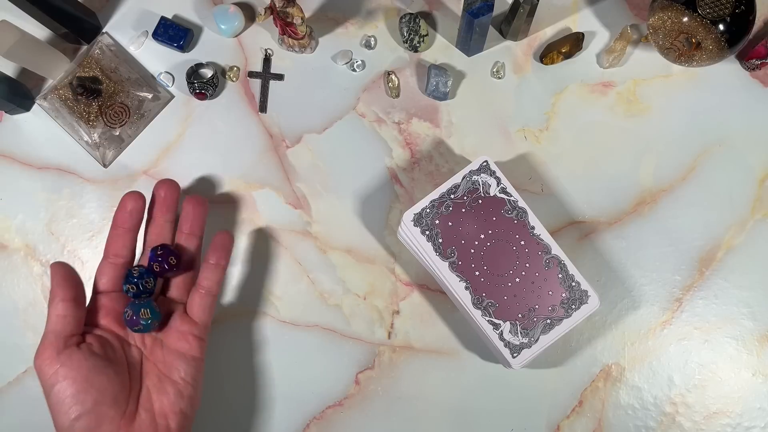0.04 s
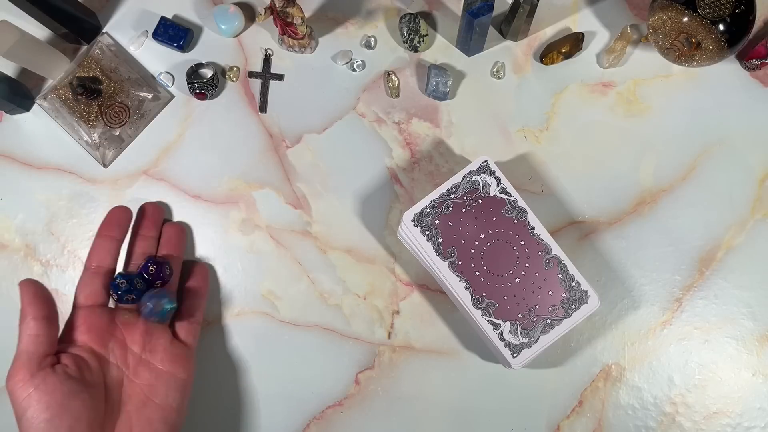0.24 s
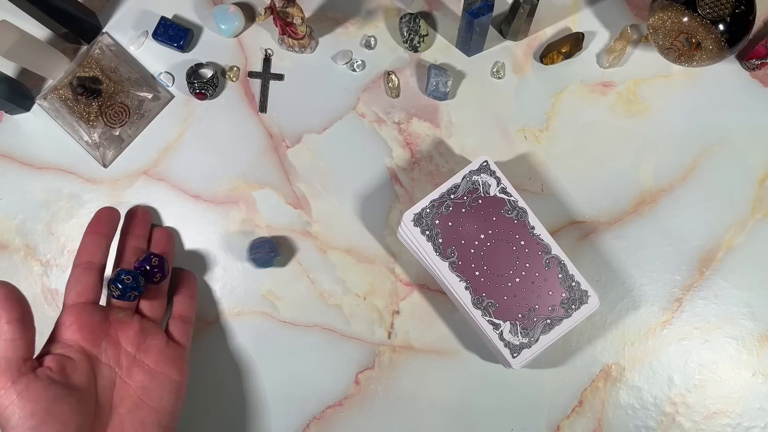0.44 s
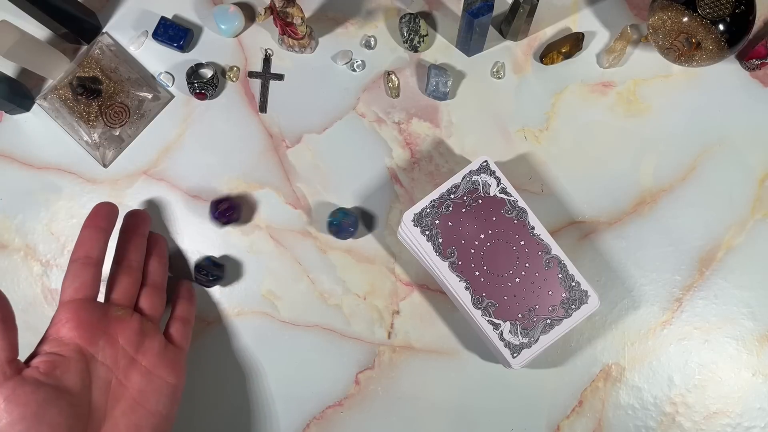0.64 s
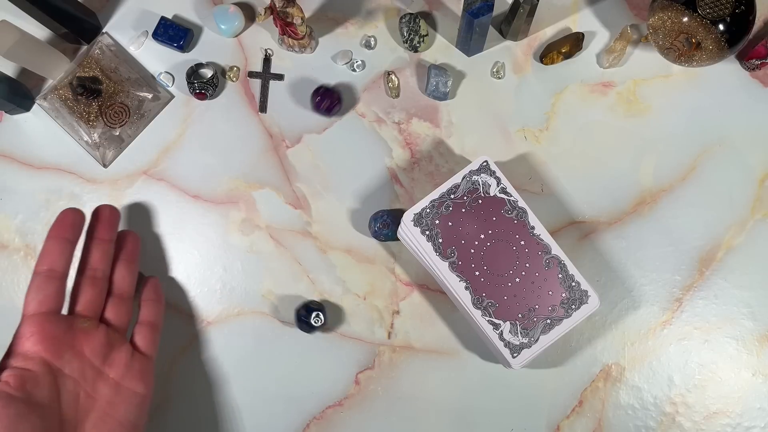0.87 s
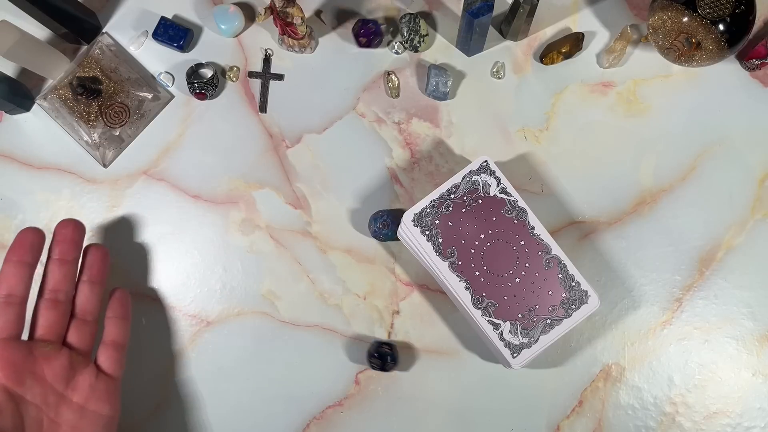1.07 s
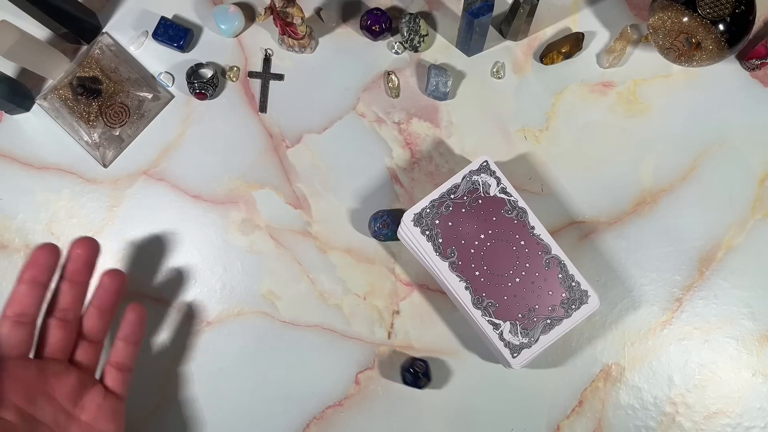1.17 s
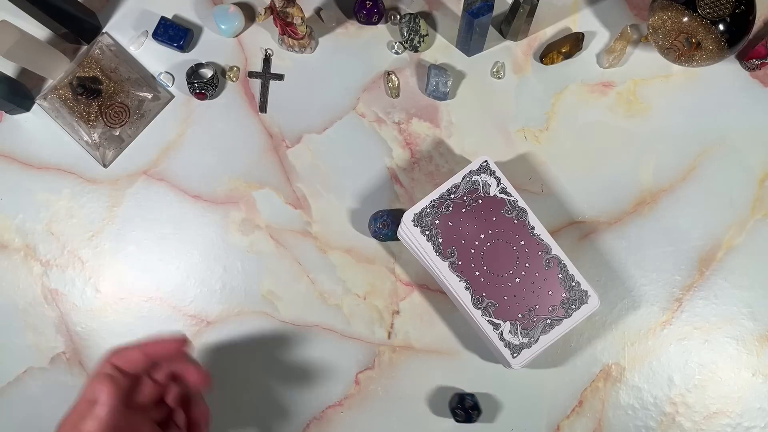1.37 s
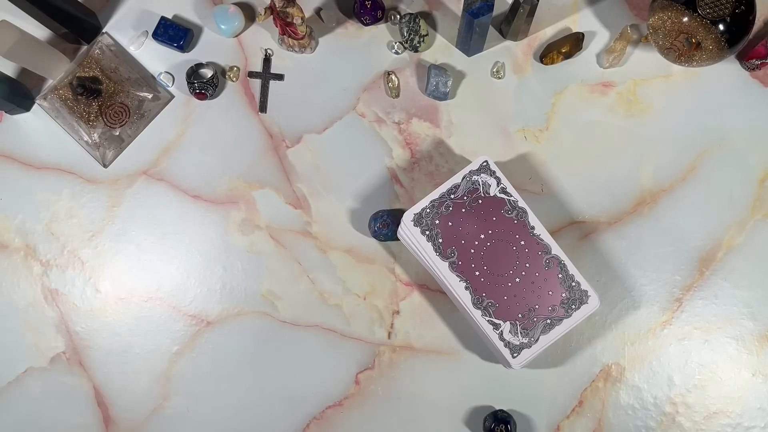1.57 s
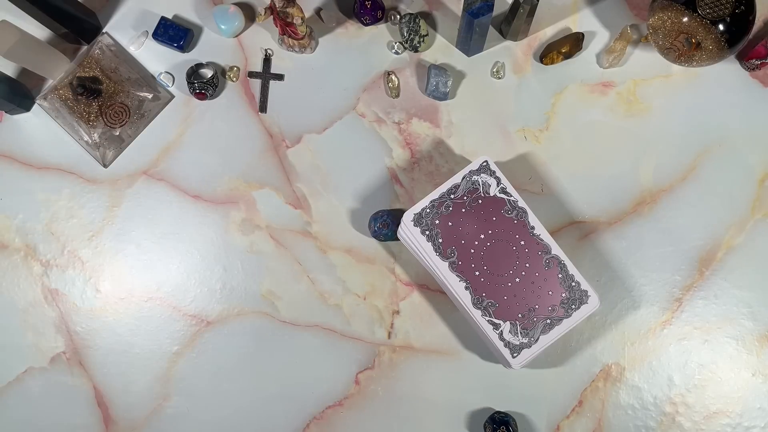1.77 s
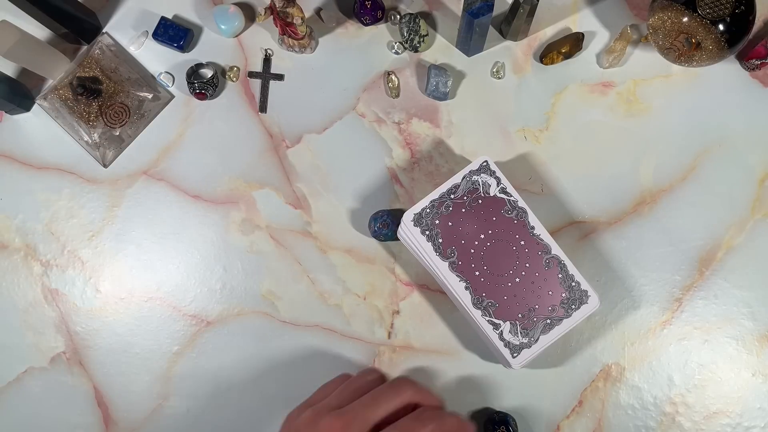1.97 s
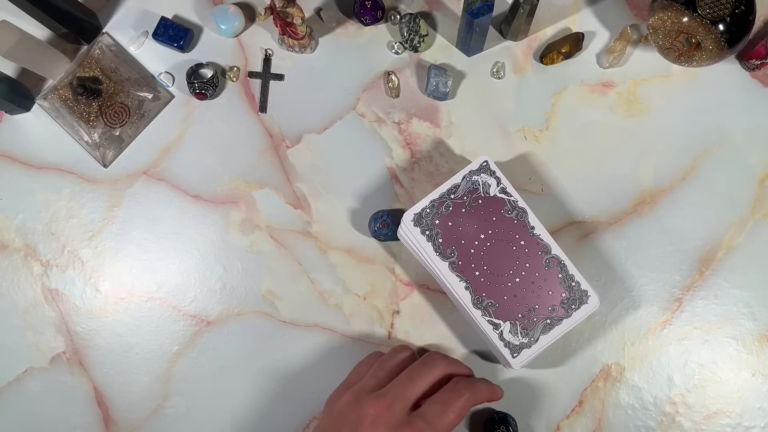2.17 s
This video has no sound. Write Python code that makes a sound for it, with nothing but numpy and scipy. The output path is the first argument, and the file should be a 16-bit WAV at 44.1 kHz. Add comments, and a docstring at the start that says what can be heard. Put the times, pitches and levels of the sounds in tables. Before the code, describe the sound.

Plastic dice are rolled on a hard tabletop, heard close up. They click faintly in a palm, then land and chatter from about 0.4 seconds, with the loudest sharp bounces between 0.6 and 0.9. Around 1 second one clinks lightly against glass and stone trinkets, followed by a small hollow knock. The last die topples in soft taps from 1.3 to 1.7 seconds, leaving a faint room hum.

```python
"""Three plastic dice drop one after another on a hard tabletop, bounce and chatter along on their edges.
Each hit is a fast-dying burst of noise that sets the top's low modes ringing. Before the throw they
click together in a palm; after it one clinks into glass and stone trinkets and stops with a hollow
knock, and the last topples to rest in soft, pitched taps.
A close stereo microphone in a small room with a faint hum."""
import sys
import numpy as np
from scipy import signal
from scipy.fft import rfft, irfft, next_fast_len
from scipy.io import wavfile

SR = 44100
rng = np.random.default_rng(int(sys.argv[2]) if len(sys.argv) > 2 else 0)


def digitize_waveform(pressure):
    """Quantize a signal to 16-bit integers and store it at the path in sys.argv[1].

    Rows of a 2-D input are taken as channels; values are limited to [-1, 1].
    """
    field = np.atleast_2d(pressure).T
    bounded = np.clip(field, -1, 1)
    quanta = np.round(bounded * 32767).astype(np.int16)
    wavfile.write(sys.argv[1], SR, quanta)


N = 97902

# spectrum of a hit on the tabletop: freq_hz, level_db
TOP_COLOUR = [(30, -47), (70, -23.5), (130, -7), (300, -1.5), (600, -0.5), (1200, 2.5), (2100, 3),
              (3400, 3), (5200, -2), (6150, -15.5), (7700, -10.5), (9200, -13.5), (10200, -23),
              (12500, -16.5), (14000, -22.5), (16000, -21)]
KNOCK_T60_S, BOUNCE_RISE_S, THUMP_HZ = 0.031, 0.00095, 700
LIKENESS = 0.71  # left-right correlation of a contact at its source


def undb(db):
    """Decibels to gain."""
    return 10 ** (np.asarray(db) / 20)


def unit(x):
    """Scale to rms 1."""
    return x / np.sqrt(np.mean(x ** 2) + 1e-20)


def decay(t, t60):
    """An envelope that falls 60 dB in t60 seconds."""
    return np.exp(-np.log(1000) * t / t60)


def curve(points, f):
    """Read (Hz, value) points on a log-frequency axis."""
    p = np.array(points)
    return np.interp(np.log(f + 1), np.log(p[:, 0]), p[:, 1])


def shape(x, db_at):
    """Minimum-phase EQ whose gain in dB is a function of frequency."""
    n = x.shape[-1]
    size = 2 * next_fast_len(n)
    cepstrum = irfft(np.log(undb(db_at(np.fft.rfftfreq(size, 1 / SR)))))
    cepstrum[1:size // 2] *= 2
    cepstrum[size // 2 + 1:] = 0
    return irfft(rfft(x, size) * np.exp(rfft(cepstrum)))[..., :n]


def pair(three, likeness):
    """Two partly alike channels from three unrelated signals."""
    return np.sqrt(likeness) * three[0] + np.sqrt(1 - likeness) * three[1:]


def add(out, start_s, x):
    """Mix a sound in at a time."""
    i = int(start_s * SR)
    out[:, i:i + x.shape[1]] += x[:, :N - i]


def ring(x, modes):
    """Drive damped resonances, each swinging up or down at first."""
    t = np.arange(x.shape[1]) / SR
    response = sum(rng.choice([-1, 1]) * undb(db) * np.sin(2 * np.pi * hz * t) * decay(t, t60)
                   for hz, db, t60 in modes)
    return signal.fftconvolve(x, response[None], axes=1)[:, :x.shape[1]]


def air():
    """Room tone: quiet, wide noise with a faint low drone."""
    # spectrum of the steady air: freq_hz, level_db
    colour = [(18, -65), (30, -29.5), (129, -12.5), (150, -4.5), (186, -17.5), (294, -7.5), (321, -17.5),
              (435, -0.5), (507, -15.5), (766, -18.5), (973, -29), (1260, -23), (5420, -56.5), (7050, -78),
              (11900, -120)]
    noise = pair(rng.standard_normal((3, N)), likeness=0.17)
    return undb(-61.5) * unit(shape(noise, lambda f: curve(colour, f)))


def room(x):
    """Diffuse reflections, longer and more alike in both channels in the bass."""
    # reverb bands: centre_hz, level_db, t60_s
    bands = np.array([(100, -8.5, 0.71), (353, -7, 0.56), (980, -17.5, 0.75), (2390, -7, 0.16),
                      (5000, -9, 0.063), (12200, -19.5, 0.091)])
    predelay_s, build_s = 0.004, 0.0044
    t = np.arange(SR // 2) / SR
    f = np.fft.rfftfreq(len(t), 1 / SR)
    noise, response = rng.standard_normal((3, len(t))), 0
    late = np.maximum(t - predelay_s, 0)
    for solo, (hz, db, t60) in zip(np.eye(len(bands)), bands):
        crossover = curve(np.column_stack([bands[:, 0], solo]), f)
        env = (1 - np.exp(-late / build_s)) * decay(late, t60)
        band = irfft(rfft(pair(noise, likeness=1 / (1 + (hz / 700) ** 2))) * crossover)
        response = response + undb(db) * band * env / np.sqrt(np.sum(env ** 2))
    return signal.fftconvolve(x, response, axes=1)[:, :N]


def microphone(x):
    """Both sides hear the same bass, the right a moment later; nearby objects scatter the treble's phase."""
    lag_s, lag_top_hz, mono_below_hz = 0.000064, 3850, 300
    f = np.fft.rfftfreq(N, 1 / SR)
    knots = np.linspace(0, SR / 2, 32)
    scatter = 0.5 * np.interp(f, knots, rng.standard_normal(len(knots))) * np.minimum(f / 3000, 2)
    phase = scatter - 2 * np.pi * np.minimum(f, lag_top_hz) * lag_s
    mid = rfft(x[0] + x[1]) / 2
    side = rfft(x[0] - x[1]) / 2 * f / np.hypot(f, mono_below_hz)
    return irfft(np.array([mid + side, (mid - side) * np.exp(1j * phase)]), N)


def contact(x, colour, bright_hz, thump_db):
    """Colour a contact force: a softer touch loses treble, a heavier one gains bass."""
    def eq_db(f):
        high_cut = 10 * np.log10(1 + (f / bright_hz) ** 4)
        low_shelf = thump_db / (1 + (f / THUMP_HZ) ** 2)
        return curve(colour, f) - high_cut + low_shelf
    return shape(x, eq_db)


def impact(db, bright_hz, colour, t60, thump_db=0):
    """One hit: a crowd of quickly damped vibrations, with other peaks and dips at every spot."""
    ripple_db, ripple_step_hz = 2, 190
    t = np.arange(SR // 4) / SR
    env = (1 - np.exp(-t / BOUNCE_RISE_S)) * decay(t, t60)
    flat_noise = unit(irfft(np.exp(2j * np.pi * rng.random((3, len(t) // 2 + 1))), len(t)))
    knots = np.arange(0, SR / 2, ripple_step_hz)
    ripple = ripple_db * rng.standard_normal(len(knots)) * np.minimum(knots / THUMP_HZ / 2, 1)
    burst = contact(pair(flat_noise, LIKENESS) * env, colour, bright_hz, thump_db)
    burst = shape(burst, lambda f: np.interp(f, knots, ripple))
    return unit(burst) * np.sqrt(np.mean(env ** 2)) * undb(db)


def chatter(length_s, db, bright_hz, colour, thump_db=0):
    """A run of tiny contacts that starts quickly, holds and dies away."""
    touches_per_s, scatter_db = 6000, 1.5
    attack_s, release_t60_s = 0.00033, 0.11
    t = np.arange(SR // 3) / SR
    touches = (rng.random(len(t)) < touches_per_s / SR) * undb(scatter_db * rng.standard_normal(len(t)))
    force = pair(rng.choice([-1, 1], (3, len(t))) * touches, LIKENESS)
    grains = contact(force, colour, bright_hz, thump_db)
    env = np.minimum(t / attack_s, 1) * decay(np.maximum(t - length_s, 0), release_t60_s)
    return unit(grains * env) * np.sqrt(np.mean(env ** 2)) * undb(db)


def struck_tones(db, bright_hz, modes, t60):
    """A few clear partials; their balance and pitch shift a little with the spot that is struck."""
    detune, spread_db = 0.018, 3
    t = np.arange(SR // 4) / SR
    env = (1 - np.exp(-t / BOUNCE_RISE_S)) * decay(t, t60)
    partials = 0
    for (hz, mode_db), (pitch_draw, level_draw) in zip(modes, rng.standard_normal((len(modes), 2))):
        hz = hz * (1 + detune * pitch_draw)
        gain = undb(mode_db + spread_db * level_draw) / np.sqrt(1 + (hz / bright_hz) ** 4)
        partials = partials + gain * np.sin(2 * np.pi * (hz * t + rng.random((3, 1))))
    return unit(pair(partials, LIKENESS) * env) * np.sqrt(np.mean(env ** 2)) * undb(db)


def with_table_ring(x):
    """A contact plus the low ringing it starts in the tabletop; higher modes die sooner."""
    # modes of the tabletop: pitch_hz, level_db
    top_modes = [(155, -7), (240, 0.5), (298, -3), (318, -3), (468, 0), (540, 0.5), (711, -4.5), (895, 1.5)]
    damped = [(hz, db, 0.19 * (300 / hz) ** 0.55) for hz, db in top_modes]
    return x + undb(-47.5) * ring(x, damped)


def dice_in_hand():
    """The dice click together, slide over the fingers and nudge the soft palm."""
    # die against die: start_s, level_db, brightness_hz
    clicks = [(0.01, -40.5, 3220), (0.146, -37, 8000), (0.154, -33, 4330), (0.249, -31.5, 7450)]
    # dice over the fingers: start_s, length_s, level_db, brightness_hz
    slides = [(0.248, 0.019, -56.5, 4580), (0.276, 0.039, -49, 6876)]
    # spectrum of the plastic dice: freq_hz, level_db
    plastic = [(100, -26.5), (1100, -22.5), (2100, -7.5), (2700, -19), (3600, 0.5), (5000, 5), (6100, -14),
               (7100, -3), (8300, -20), (10000, -40), (16000, -41.5)]
    out = np.zeros((2, N))
    for start_s, db, bright_hz in clicks:
        add(out, start_s, impact(db, bright_hz, plastic, t60=0.018))
    for start_s, length_s, db, bright_hz in slides:
        add(out, start_s, chatter(length_s, db, bright_hz, plastic))
    palm_bump = chatter(length_s=0.017, db=-55, bright_hz=332.4, colour=TOP_COLOUR)
    add(out, 0.143, palm_bump)
    return out


def release_tick():
    """The first die ticks as it leaves the hand: a brief noisy push drives short resonances."""
    # resonances of the tick: pitch_hz, level_db, t60_s
    modes = [(2380, 0, .009), (2700, 0, .008), (3250, -5, .006), (3690, -4, .008), (4220, -2, .008)]
    start_s, push_s, peak_db = 0.3645, 0.012, -18
    t = np.arange(SR // 10) / SR
    swell = np.sin(np.pi * np.minimum(t / push_s, 1) ** 2) ** 2
    push = pair(rng.standard_normal((3, len(t))), LIKENESS) * swell
    bandpass = signal.butter(4, [1900, 4600], "band", fs=SR, output="sos")
    tick = signal.sosfilt(bandpass, ring(push, modes))
    out = np.zeros((2, N))
    add(out, start_s, undb(peak_db) * tick / np.abs(tick).max())
    return out


def trinkets():
    """A die runs into glass and stone with sharp, bright clinks."""
    # hits on the trinkets: start_s, level_db, brightness_hz
    clinks = [(.829, -28.5, 8900), (0.9768, -29, 7740), (1.0015, -27, 10800), (1.0315, -22.5, 8970),
              (1.058, -35.5, 11200), (1.0651, -28, 12500), (1.074, -34.5, 11160), (1.085, -29.5, 9000),
              (1.1365, -39.5, 11740), (1.144, -38, 4000)]
    # spectrum of glass and stone: freq_hz, level_db
    colour = [(300, -34), (2000, -16.5), (4000, 1), (5500, 0.5), (7000, 3.5), (8800, 2.5), (10200, -8),
              (11800, 3), (13300, 2.5), (14500, -3), (16000, -8)]
    out = np.zeros((2, N))
    for start_s, db, bright_hz in clinks:
        add(out, start_s, impact(db, bright_hz, colour, t60=0.038))
    return out


def hollow_knock():
    """A die stops against something hollow: clear tones layered with a dry knock."""
    # modes of the hollow body: pitch_hz, level_db
    modes = [(856, 0), (1530, 1), (1640, -0.5), (2170, -0.5), (2998, -4), (3600, -5.5)]
    start_s = 1.1546
    out = np.zeros((2, N))
    add(out, start_s, struck_tones(db=-25.5, bright_hz=4020, modes=modes, t60=0.048))
    add(out, start_s, impact(db=-26, bright_hz=2440, colour=TOP_COLOUR, t60=KNOCK_T60_S, thump_db=-10.5))
    return out


def last_topples():
    """The last die tips from face to face in soft, pitched taps and creeps on between them."""
    # a face lands: start_s, level_db, brightness_hz
    taps = [(1.2754, -40, 2070), (1.2979, -27.5, 3340), (1.304, -25, 3200), (1.356, -26.5, 3710),
            (1.388, -39.5, 2894), (1.441, -44.5, 2230), (1.494, -53, 2050), (1.594, -50, 2092),
            (1.667, -39.5, 2404)]
    # tones of the die on the top: pitch_hz, level_db
    modes = [(484, -5), (1090, -13), (1600, -1.5), (1880, 4.5), (2140, 2.5), (2450, -13), (2740, -9.5),
             (3430, 1)]
    # faint creeping: start_s, length_s, level_db, brightness_hz
    creeps = [(1.318, 0.1, -54.5, 2318), (1.447, 0.031, -55.5, 1800), (1.587, 0.068, -62, 1538)]
    # spectrum of a soft contact: freq_hz, level_db
    soft = [(40, -24), (300, 4.5), (1300, 0.5), (2150, 6.5), (2800, -1), (3600, -5), (4700, -10),
            (9000, -27)]
    out = np.zeros((2, N))
    for start_s, db, bright_hz in taps:
        add(out, start_s, struck_tones(db, bright_hz, modes, t60=0.035))
        crack = impact(db - 7.5, bright_hz, soft, KNOCK_T60_S)
        add(out, start_s, with_table_ring(crack))
    for start_s, length_s, db, bright_hz in creeps:
        add(out, start_s, chatter(length_s, db, bright_hz, soft))
    return out


def dice_rolls():
    """The dice chatter along on their edges and keep the top ringing."""
    # runs across the table: start_s, length_s, level_db, brightness_hz
    rolls = [(0.382, 0.045, -27.5, 4563), (0.437, 0.06, -39, 4500), (0.467, 0.028, -23, 4642),
             (0.512, 0.075, -37.5, 4500), (0.537, 0.019, -22.5, 4657), (0.602, 0.026, -20, 4800),
             (0.658, 0.038, -21.5, 4563), (0.74, 0.09, -31.5, 2955), (0.853, 0.094, -34, 2670),
             (0.97, 0.068, -34, 2800)]
    # spectrum of the small edge contacts: freq_hz, level_db
    colour = [(50, -29), (150, -5.5), (1200, 4), (3400, 6.5), (5300, -1.5), (6200, -25.5), (7300, -7.5),
              (8900, -14.5), (10200, -29.5), (12300, -14.5), (13300, -23.5), (14200, -40)]
    out = np.zeros((2, N))
    for start_s, length_s, db, bright_hz in rolls:
        add(out, start_s, with_table_ring(chatter(length_s, db, bright_hz, colour, thump_db=5.5)))
    return out


def dice_bounces():
    """The dice land and bounce on the hard top: sharp knocks over its low ring."""
    # hits on the table: start_s, level_db, brightness_hz, thump_db
    knocks = [(0.4679, -27, 4040, 0), (0.5856, -3, 3900, -6), (.598, -11, 4000, -1),
              (0.619, -12, 5400, 3.5), (.639, -12.5, 4430, 2), (.652, -5, 4340, -8.5),
              (.658, -7.5, 4540, -6.5), (.664, -1.5, 4300, 2), (0.7133, -8.5, 4200, -16.5),
              (.7185, -4, 3780, -4), (.7224, -1.5, 2700, 1.5), (0.7738, 1.5, 3900, -3.5),
              (0.7809, -3.5, 3900, 1), (0.812, -14, 3500, -4.5), (.818, -8, 3350, 5),
              (0.827, -3, 3400, -1.5), (.8512, -9, 3028, -3), (0.8816, -8, 4104, 1), (.894, -10, 3200, 3),
              (0.9268, -11, 3080, 3.5), (0.9366, -21, 3000, 2.5), (0.962, -17.5, 3540, -6.5),
              (.991, -12, 2500, -3), (1.001, -20, 3040, 6.5), (1.0142, -14.5, 2500, 0),
              (1.037, -20, 2870, -1.5), (1.056, -22, 2500, -4), (1.065, -21, 3000, 0.5),
              (1.073, -19.5, 2800, -20)]
    out = np.zeros((2, N))
    for start_s, db, bright_hz, thump_db in knocks:
        add(out, start_s, with_table_ring(impact(db, bright_hz, TOP_COLOUR, KNOCK_T60_S, thump_db)))
    return out


def scene():
    """The close-miked throw with reverb and room tone, leaning slightly right."""
    on_table = dice_bounces() + dice_rolls() + hollow_knock() + last_topples()
    dice = microphone(on_table + dice_in_hand() + release_tick() + trinkets())
    balance_db = [[-0.685], [0.685]]
    return (dice + room(dice) + air()) * undb(balance_db)


def record(dry):
    """The hardest knocks just clip the recorder; a steep low-pass cuts the top at 16 kHz."""
    lowpass = signal.ellip(8, 0.2, 70, 16000, fs=SR, output="sos")
    return signal.sosfilt(lowpass, np.clip(dry, -1, 1))


dry = scene()
out = record(dry)
digitize_waveform(out)
```